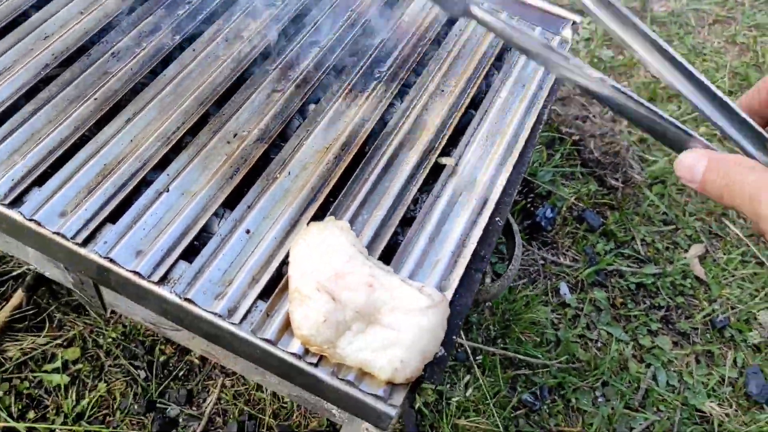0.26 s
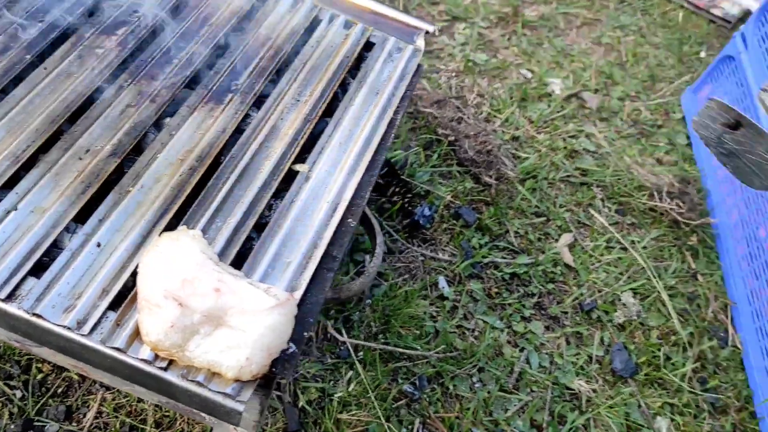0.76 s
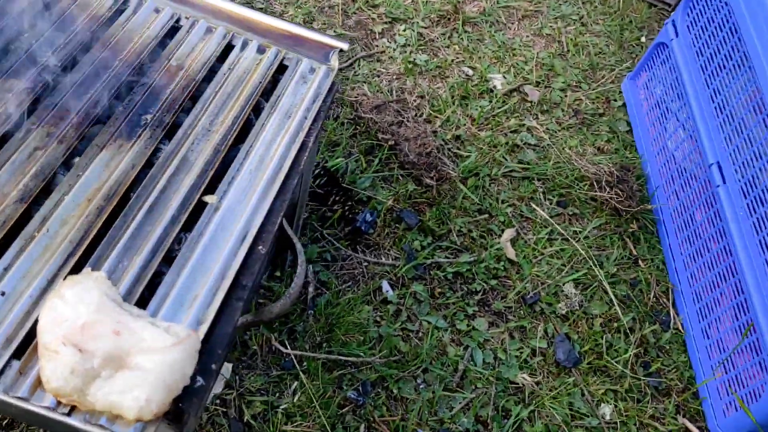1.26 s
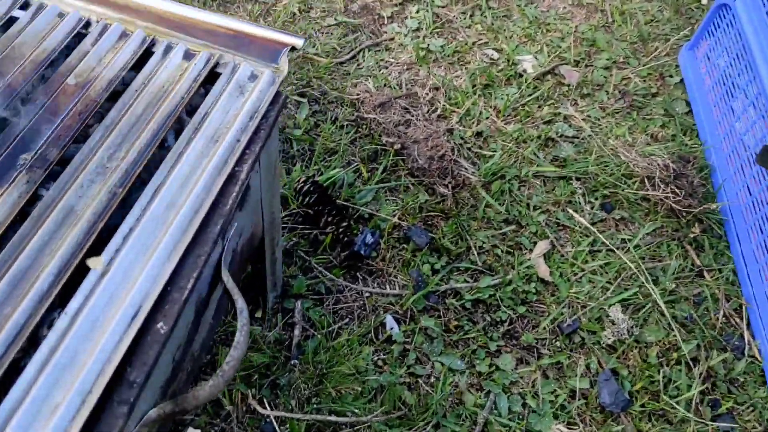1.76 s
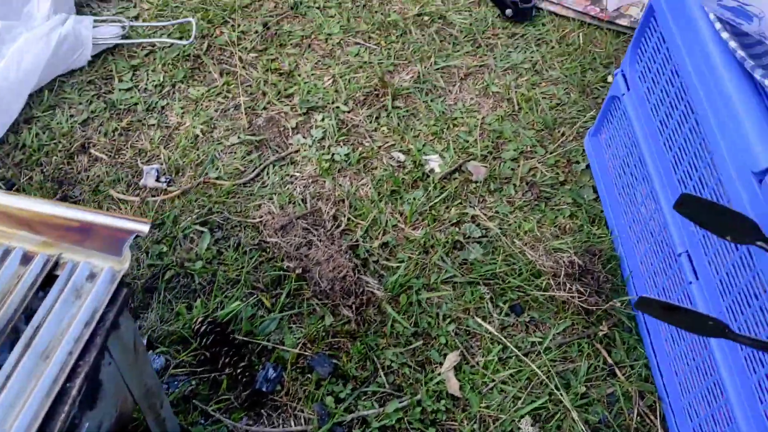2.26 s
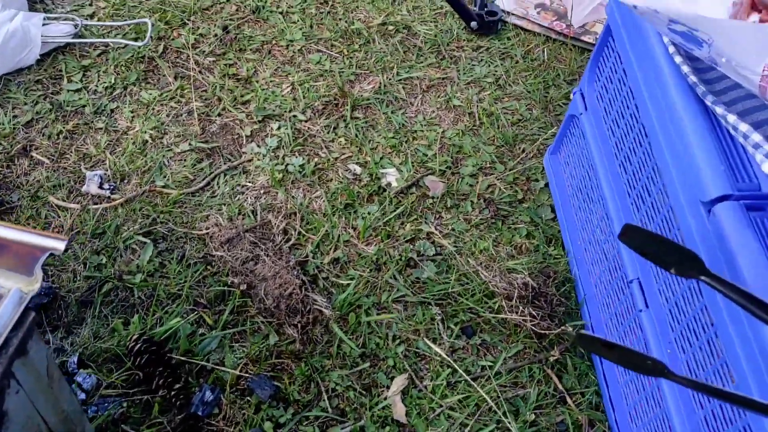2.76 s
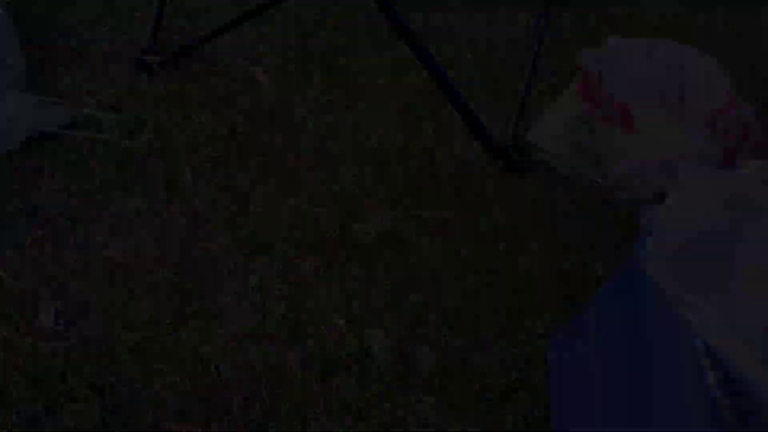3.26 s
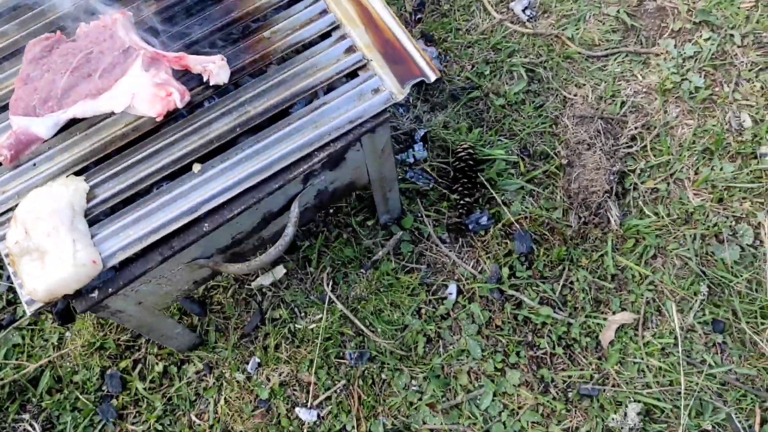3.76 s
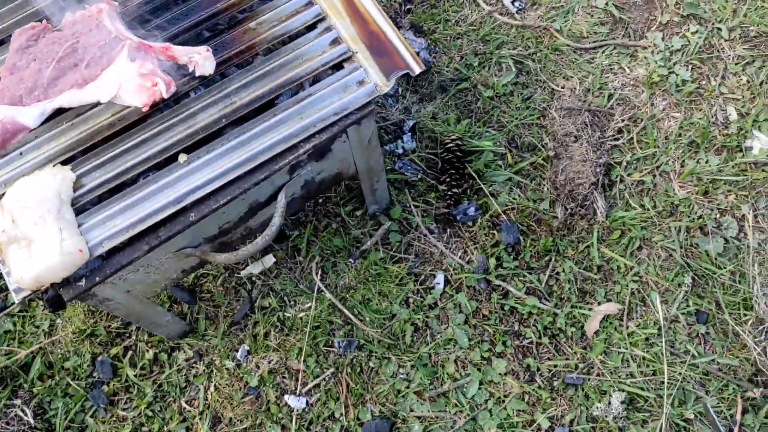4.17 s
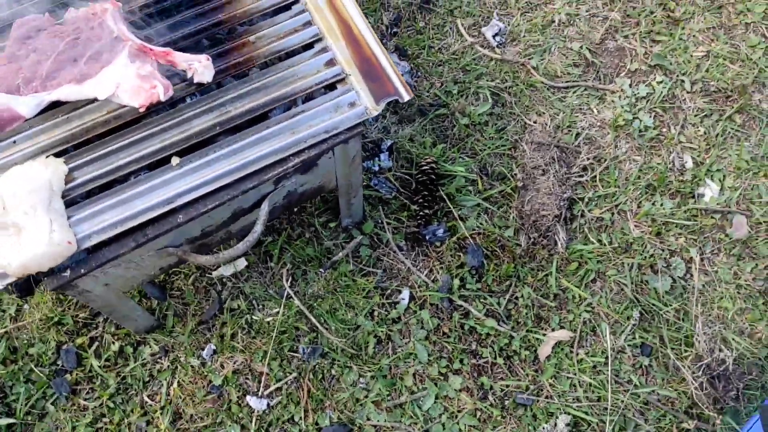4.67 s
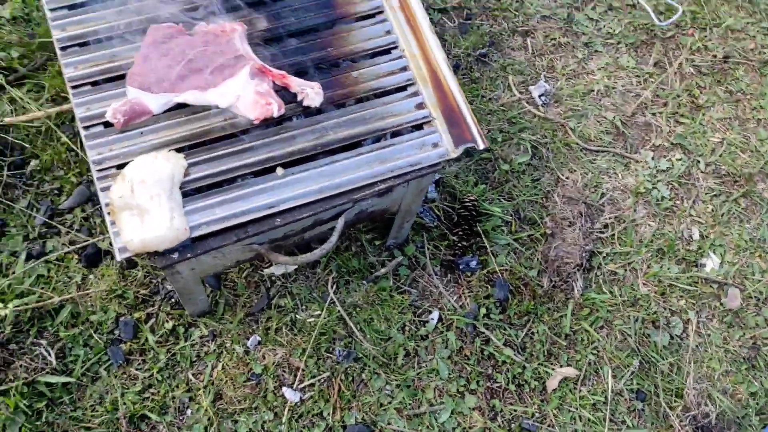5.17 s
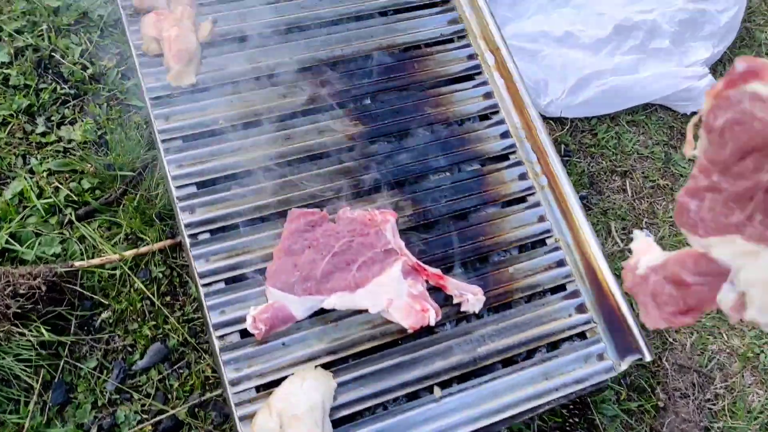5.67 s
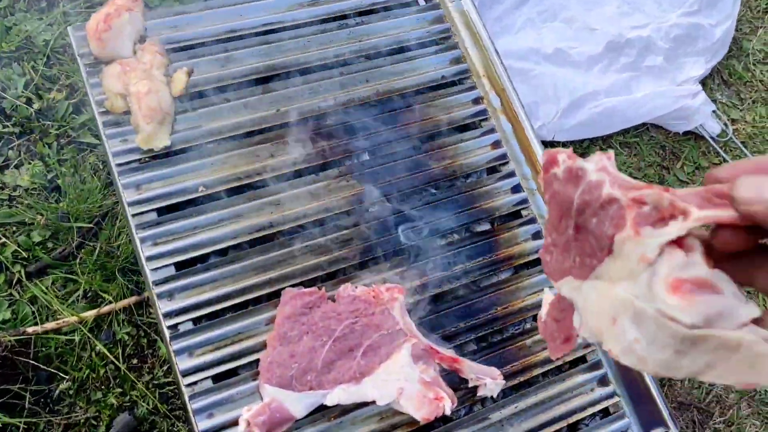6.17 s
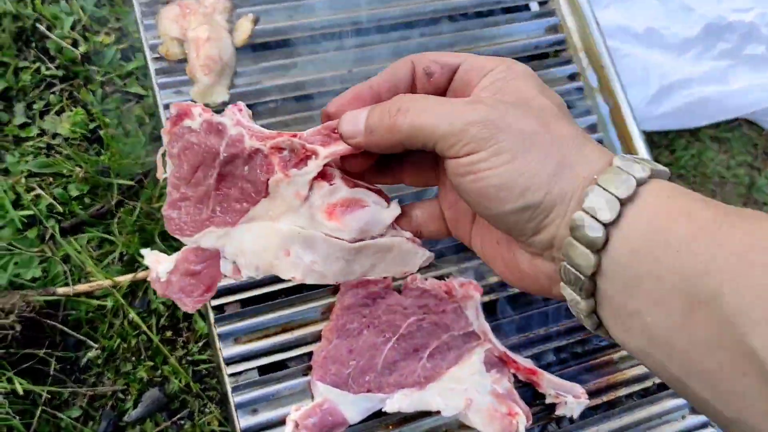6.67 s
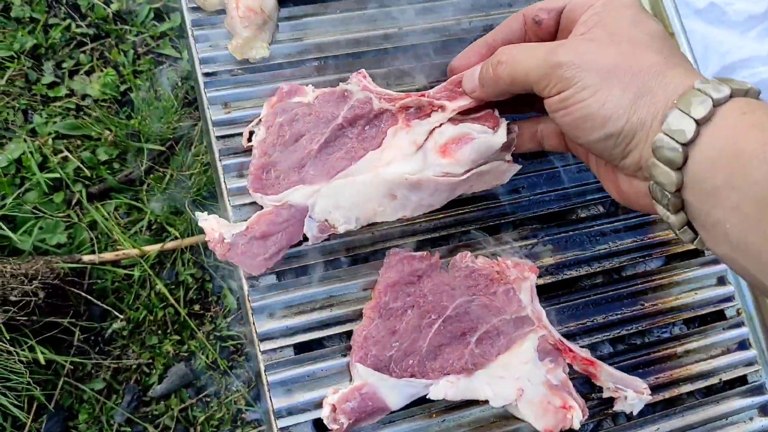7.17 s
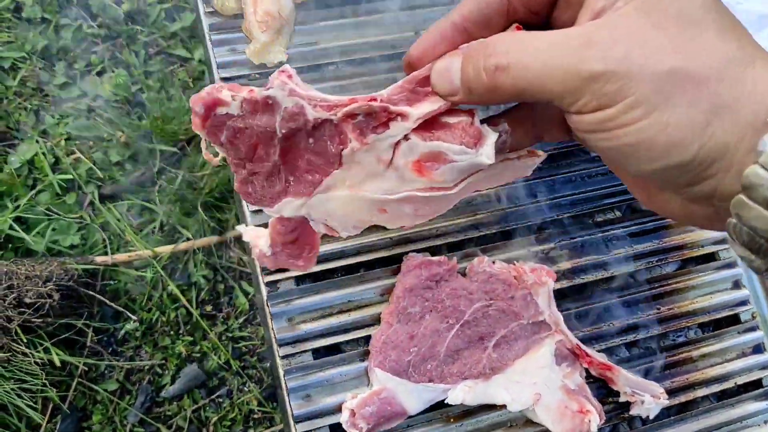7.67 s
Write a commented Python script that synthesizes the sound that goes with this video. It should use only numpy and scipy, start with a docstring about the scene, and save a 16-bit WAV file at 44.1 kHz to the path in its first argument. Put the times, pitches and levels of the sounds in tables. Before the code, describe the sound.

Outdoors, over a faint distant hum, metal tongs clank twice against a grill and then land in a plastic crate while the coals hiss softly. After a tiny break in the sound, meat sizzles close to the microphone, bright and uneven, surging and popping with fat until the end. Soft wind rumble and dull finger bumps come through the handheld microphone, and a finger knocks it sharply just before the finish.

```python
"""Chop on a charcoal grill.

Steel tongs knock twice on the bars and ring, then drop into a plastic crate; fat hisses on the coals.
After two brief dropouts a chop sizzles close by: bursting steam bubbles, flares of juice, spits of fat.
Wind and fingers brush the handheld recorder, whose two microphone ports each ring at their own pitch.
A distant outdoor hum lies underneath."""
import sys
import numpy as np
from scipy import signal
from scipy.fft import rfft, irfft
from scipy.io import wavfile
from scipy.ndimage import uniform_filter1d

SR = 44100
rng = np.random.default_rng(int(sys.argv[2]) if len(sys.argv) > 2 else 0)


def int16_out(signal):
    """Quantize to a 16-bit WAV file."""
    q = np.round(np.clip(np.atleast_2d(signal).T, -1, 1) * 32767)
    wavfile.write(sys.argv[1], SR, q.astype(np.int16))


N = 349713
T = np.arange(N) / SR
TAPS, BAND_LIMIT_HZ = 4096, 15750
BIN_HZ, FULL_BIN_HZ = np.fft.rfftfreq(TAPS, 1 / SR), np.fft.rfftfreq(N, 1 / SR)


def amp(db):
    return 10 ** (np.asarray(db) / 20)


def unit_rms(x):
    return x / np.sqrt(np.mean(x ** 2) + 1e-20)


def curve(rows):
    return np.interp(T, *np.transpose(rows))


def add(mix, start_s, sound):
    part = mix[:, round(start_s * SR):][:, :sound.shape[1]]
    part += sound[:, :part.shape[1]]


def spectrum(rows):
    """Breakpoints to dB per bin, left and right."""
    hz, *columns = np.transpose(rows)
    return np.array([np.interp(np.log(BIN_HZ + 1), np.log(hz), db) for db in columns]) * np.ones((2, 1))


def colour(x, db):
    """Minimum-phase filter; keeps the power of white noise."""
    log_gain = np.log(unit_rms(amp(db)) + 1e-5)
    mirrored = np.concatenate([log_gain, log_gain[:, -2:0:-1]], axis=1)
    response = np.fft.ifft(np.exp(np.conj(signal.hilbert(mirrored)))).real
    return signal.oaconvolve(x, response, axes=1)[:, :x.shape[1]]


def wander(hz):
    """Low-passed random drift, RMS 1."""
    return unit_rms(irfft(rfft(rng.standard_normal(N)) / (1 + (FULL_BIN_HZ / hz) ** 2), N))


def swell(start_s, length_s, attack_s, release_s):
    """Linear rise, hold, exponential fall."""
    t = T - start_s
    return np.clip(t / attack_s, 0, 1) * np.exp(-np.clip((t - length_s) / release_s, 0, 30))


def swells(rows, attack_s, release_s, rest_db):
    """Power sum of swells and a resting level."""
    power = sum((amp(db) * swell(s, length_s, attack_s, release_s)) ** 2 for s, length_s, db, *_ in rows)
    return np.sqrt(amp(rest_db) ** 2 + power)


def burst(decay_s, tail_db=-35, tail_s=0.026):
    """Noise puff with a weak tail; energy of 20 ms at RMS 1."""
    t = T[:SR // 4]
    puff = rng.standard_normal((2, len(t))) * (np.exp(-t / decay_s) + amp(tail_db) * np.exp(-t / tail_s))
    return puff * np.sqrt(.02 * SR / np.sum(puff ** 2, axis=1, keepdims=True))


def close_pair(x, merge_hz=450):
    """Long waves reach both ports alike: the channels merge in the bass."""
    coherence = 1 / (1 + (FULL_BIN_HZ / merge_hz) ** 2)
    mid = rfft(x[0] + x[1]) * np.sqrt(1 + coherence) / 2
    side = rfft(x[0] - x[1]) * np.sqrt(1 - coherence) / 2
    return irfft(np.array([mid + side, mid - side]), N)


# Port resonances, left then right: f/Hz, width/Hz, gain/dB
PORT_MODES = [(8530, 945, 19), (7292, 860, 18)]

def ported(rows):
    """Spectrum behind the two resonant microphone ports."""
    power = [1 + (amp(db) ** 2 - 1) / (1 + (2 * (BIN_HZ - hz) / width) ** 2)
             for hz, width, db in PORT_MODES]
    return spectrum(rows) + 10 * np.log10(power)


# Hum spectrum: f/Hz, level/dB
HUM_SPECTRUM = [(30, 8), (120, -14.5), (290, 2.5), (450, -7.5), (1200, -18), (12000, -38.5)]
# Hum envelope: t/s, level/dB
HUM_LEVEL = [(0, -56.5), (.87, -54), (1.02, -61.5), (1.45, -53), (1.9, -59), (2.6, -65.5), (3.5, -60)]

def distant_hum():
    """Low outdoor noise, slightly left."""
    air = amp(curve(HUM_LEVEL)) * colour(rng.standard_normal((2, N)), ported(HUM_SPECTRUM))
    return close_pair(air) * amp([[2], [-2]])


# Sizzle spectrum: f/Hz, then level/dB for side left, side right, front left, front right
SIZZLE_SPECTRA = np.array([(290, -21.5, -27.5, -25.5, -27.0), (1550, -25.5, -24, -15.5, -12.5),
                  (2430, -14.5, -3.5, -13.5, -6.5), (6300, -11.0, -10.5, -6.5, -2),
                  (6790, -6.0, 1.0, -1.5, -9.0), (9080, -9, 1.0, -2.0, 0),
                  (10570, -19.0, -12.5, -13.0, -7.5), (14960, -19.5, -21.0, -15.0, -3.5)])

def sizzle_colour(x, facing):
    """Tone of the sizzle by direction: 0 = off to the right, 1 = ahead."""
    side, front = ported(SIZZLE_SPECTRA[:, :3]), ported(SIZZLE_SPECTRA[:, [0, 3, 4]])
    return (1 - facing) * colour(x, side) + facing * colour(x, front)


def bubbles(spread_db, clump_db, steady_power, per_s=2400, decay_s=0.00055):
    """Tiny steam bubbles burst in clumps over a steady hiss."""
    size = amp(spread_db * np.minimum(rng.exponential(1, N), 5))
    pops = size * (rng.random(N) < per_s / SR) * amp(clump_db * wander(hz=42))
    power = signal.lfilter([1], [1, -np.exp(-2 / (decay_s * SR))], pops ** 2)
    return unit_rms(np.sqrt(power / power.mean() + steady_power) * rng.standard_normal((2, N)))


# Steam hiss: f/Hz, level/dB
JET_SPECTRUM = [(300, -2), (6000, -4), (10500, -20.5)]

def steam_jet(hz, hump_db=8):
    """Unsteady rush of steam, lifted in the octave around hz."""
    hump = hump_db / (1 + (2 * np.log2((BIN_HZ + 1) / hz)) ** 2)
    rush = rng.standard_normal((2, N)) * amp(1.8 * wander(hz=20))
    return colour(rush, spectrum(JET_SPECTRUM) + hump)


# Steam puffs off the coals: t/s, length/s, level/dB, f/Hz
COAL_PUFFS = [(0.95, 0.31, -52.5, 1500), (1.22, 0.31, -52, 5300), (1.85, 0.25, -61, 2287),
              (3.03, 0.11, -51, 5300)]

def coals(attack_s=.2, release_s=0.25, rest_db=-67.5, fizz_db=-58.5):
    """Fat steams on the coals until the second dropout ends; fizz grows with the steam."""
    steam_level = swells(COAL_PUFFS, attack_s, release_s, rest_db)
    fizz = sizzle_colour(bubbles(spread_db=2, clump_db=2.5, steady_power=1.3), facing=0)
    steam = amp(rest_db) * steam_jet(hz=5400)
    for s, length_s, db, hz in COAL_PUFFS:
        steam += amp(db) * swell(s, length_s, attack_s, release_s) * steam_jet(hz)
    hiss = np.hypot(amp(fizz_db), 0.56 * steam_level) * fizz + steam
    return hiss * (T < DROPOUTS[1][1])


def strike(hits, clash_spectrum, modes, ring_db, shimmer_db, shimmer_t60_s):
    """Each blow: a brief clash, a few strong modes, a shimmer of 240 weak ones."""
    clash, ring = np.zeros((2, N)), np.zeros((2, N))
    t, t_short = T[:SR], T[:SR // 4]
    weak_hz = rng.uniform(0, np.sqrt(BAND_LIMIT_HZ), (240, 1)) ** 2
    fade = amp(-60 * t_short / (shimmer_t60_s * rng.uniform(.5, 1, weak_hz.shape)))
    weak_modes = fade * np.sin(2 * np.pi * weak_hz * t_short) / np.sqrt(len(weak_hz))
    for s, db, decay_s in hits:
        add(clash, s, amp(db) * burst(decay_s))
        add(clash, s, amp(db + shimmer_db) * rng.standard_normal((2, len(weak_hz))) @ weak_modes)
        for hz, mode_db, t60_s in modes:
            phase = 2 * np.pi * rng.random() + np.array([[0], [1]])
            add(ring, s, amp(db + mode_db - 60 * t / t60_s) * np.sin(2 * np.pi * hz * t + phase))
    return colour(clash, ported(clash_spectrum)) + amp(ring_db) * ring


# Knocks and bounces on the bars: t/s, level/dB, contact decay/s
BAR_HITS = [(0.1105, -18, 0.0092), (0.1255, -26, 0.0028), (0.2575, -17, 0.0035), (0.285, -30, 0.0085)]
# Steel clash: f/Hz, level/dB
BAR_SPECTRUM = [(100, -25.5), (300, -3), (750, -4.5), (1200, -7), (2300, 5), (3100, -13), (4200, -5.5),
                (8500, -5), (12000, -12.5)]
# Modes of tongs and bars: f/Hz, level/dB, t60/s
BAR_MODES = [(264.7, -16, 0.91), (404, -8.5, 0.24), (3919, -10, 0.2), (5140, -13.5, 0.66),
             (6800, 10.5, 0.048), (7320, 6, 0.14), (7460, 5.5, 0.098), (8390, 12.5, 0.058),
             (9900, -22.5, 0.37), (12710, -11.5, 0.17)]

def tongs_on_bars():
    """Steel hits steel, bounces and rings."""
    steel = strike(BAR_HITS, BAR_SPECTRUM, BAR_MODES, ring_db=-12, shimmer_db=-1, shimmer_t60_s=0.16)
    return close_pair(steel * amp([[1], [-1]]))


# Single spits of fat: t/s, level/dB
FAT_SPITS = [(0.505, -55), (1.769, -51), (2.389, -52), (3.653, -26), (4.1565, -24.5), (5.503, -30),
             (5.5732, -25), (5.6714, -22.5), (5.7907, -26), (5.9496, -28.5), (6.0549, -26), (6.1167, -28.5),
             (6.4904, -23.5), (7.2543, -23.5), (7.283, -23.5), (7.3777, -25), (7.606, -25), (7.7265, -27),
             (7.8193, -22)]

def spits(heat, small_per_s=16, small_db=-12, ping_hz=(7700, 9270), ping_decay_s=0.00052):
    """Fat drops burst with a ping and a puff; small random ones follow the sizzle level."""
    out, t = np.zeros((2, N)), T[:SR // 4]
    onsets = np.flatnonzero((rng.random(N) < small_per_s / SR) * (T > JUICE_FLARES[0][0]))
    levels_db = 20 * np.log10(heat[onsets]) + small_db + 3.5 * rng.uniform(-1, 1, len(onsets))
    for s, db in FAT_SPITS + list(zip(T[onsets], levels_db)):
        ping = amp(12) * np.cos(2 * np.pi * rng.uniform(*ping_hz) * t) * np.exp(-t / ping_decay_s)
        puff = amp(-2) * burst(decay_s=0.00088, tail_db=-24)
        add(out, s, amp(db) * (ping + puff))
    return out


# Gusts: t/s, length/s, level/dB
WIND_GUSTS = [(0.88, 0.2, -44), (3.55, 0.35, -41), (4.22, 0.5, -42), (5.17, 0.3, -40), (6.27, 0.106, -48),
              (6.85, 0.16, -41)]
# Wind rumble: f/Hz, level/dB
WIND_SPECTRUM = [(20, 0.5), (90, -12), (200, -24.5), (1000, -55)]

def wind():
    """Lumps of wind buffet each port separately, mostly the left."""
    lumps = np.array([unit_rms(amp(5.7 * wander(hz=6.3))) for _ in range(2)])
    level = swells(WIND_GUSTS, attack_s=0.04, release_s=0.0063, rest_db=-69.5)
    rumble = colour(rng.standard_normal((2, N)) * lumps, spectrum(WIND_SPECTRUM))
    return level * rumble * amp([[3], [-10]])


# Bumps of the grip: t/s, level/dB, f/Hz
GRIP_BUMPS = [(1.885, -54, 500), (3.462, -46.5, 293), (3.556, -40.5, 83.5), (3.651, -45, 1170),
              (3.767, -47, 517), (3.789, -42.5, 564), (3.876, -43, 600), (4.017, -45.5, 327),
              (4.114, -41.5, 385), (4.209, -50, 290), (4.242, -49, 700), (4.334, -50, 830),
              (4.428, -47, 450), (4.502, -52, 790), (4.695, -46.5, 330), (4.785, -40, 79.4),
              (4.914, -39, 100), (5.039, -39, 89.5), (5.053, -37.5, 162), (5.39, -44, 191),
              (6.161, -41, 430)]

def grip_bumps():
    """Dull finger blows on the casing, mostly left; lower ones last longer."""
    out = np.zeros((2, N))
    for s, db, hz in GRIP_BUMPS:
        casing = spectrum([(hz / 5, -14), (hz * 1.01, 0), (hz * 3, -14), (hz * 20, -55)])
        blow = burst(decay_s=0.007 * np.sqrt(400 / hz))
        add(out, s, amp(db) * colour(blow, casing))
    return out * amp([[4], [-8]])


# Landings in the crate: t/s, level/dB, contact decay/s
CRATE_HITS = [(2.0098, -23.5, 0.0034), (2.0150, -22.5, 0.0025), (2.184, -37.5, 0.0018),
              (2.1945, -36, 0.0088)]
# Blow on plastic: f/Hz, level/dB
PLASTIC_SPECTRUM = [(80, -32.5), (230, -2), (550, -4.5), (1150, 6.5), (1700, -10), (2600, -2.5),
                    (3600, -16.5), (15000, -37.5)]
# Crate modes: f/Hz, level/dB, t60/s
PLASTIC_MODES = [(206, -7, 0.2), (417, -4, 0.1), (1085, -14, 0.2), (1260, -2, 0.045), (2053, 6.5, 0.0309)]

def tongs_in_crate():
    """The tongs land on plastic and settle."""
    return close_pair(strike(CRATE_HITS, PLASTIC_SPECTRUM, PLASTIC_MODES,
                             ring_db=-13.5, shimmer_db=-11.5, shimmer_t60_s=0.076))


# Casing click: f/Hz, level/dB
TICK_SPECTRUM = [(400, 1.5), (1700, -4), (8000, -22)]

def tick():
    return colour(burst(decay_s=0.0013), ported(TICK_SPECTRUM))


# Casing ticks: t/s, level/dB
CASING_TICKS = [(2.9, -50.5), (7.488, -40)]

def casing_ticks():
    """The casing clicks drily in the hand."""
    out = np.zeros((2, N))
    for s, db in CASING_TICKS:
        add(out, s, amp(db) * tick())
    return out


def patchy(x, depth_db, width_hz, life_s):
    """Short-lived resonances at random pitches."""
    frames = signal.stft(x, nperseg=512, noverlap=384)[2]
    field = rng.standard_normal(frames.shape[1:])
    lag_s = np.fft.fftfreq(field.shape[0], SR / 512)[:, None]
    rate_hz = np.fft.fftfreq(field.shape[1], 128 / SR)
    blur = np.exp(-(lag_s * width_hz) ** 2 - (rate_hz * life_s) ** 2)
    gain_db = depth_db * unit_rms(np.fft.ifft2(np.fft.fft2(field) * blur).real)
    return signal.istft(frames * unit_rms(amp(gain_db)), nperseg=512, noverlap=384)[1][:, :N]


# Simmer between flares: t/s, level/dB
SIMMER_LEVEL = [(3.4, -45.5), (3.62, -27), (5.4, -30), (5.87, -33), (6.1, -26.5), (6.65, -29.5),
                (7.9, -25.5)]
# Juice meets the hot bars: t/s, length/s, level/dB, outer-band gain/dB
JUICE_FLARES = [(3.645, 0.019, -24, 3.5), (3.821, 0.13, -25, 0.5), (4.024, 0.19, -26.5, -2),
                (4.444, 0.081, -24.5, 1), (4.578, 0.24, -29, 3), (5.068, 0.11, -26.5, 3.5),
                (5.268, 0.1, -25.5, -1), (5.646, 0.056, -24.5, -5), (5.736, 0.019, -26, -1),
                (6.358, 0.1, -24, -3), (6.903, 0.21, -23.5, -0.5), (7.15, 0.13, -24.5, -0.5),
                (7.415, 0.023, -18, -2), (7.787, 0.19, -32.5, 1.5)]
# Grill direction: t/s, facing (0 = right, 1 = ahead)
GRILL_FACING = [(3.4, 0.21), (5.2, 0.02), (5.55, 0.68), (6.2, 0.73)]

def chop(attack_s=0.02, release_s=0.04):
    """Fat spits throughout; from the end of the first dropout the chop simmers, flares and sputters."""
    fizz = bubbles(spread_db=2.8, clump_db=1, steady_power=0.4) * (T > DROPOUTS[0][1])
    heat = swells(JUICE_FLARES, attack_s, release_s, curve(SIMMER_LEVEL))
    steam = patchy(amp(1.62) * heat * fizz, depth_db=3, width_hz=270, life_s=0.045)
    sizzle = sizzle_colour(steam + spits(heat) + sputters(), curve(GRILL_FACING))
    # Bubble sizes come and go, so the outer bands waver separately.
    low = signal.sosfiltfilt(signal.butter(4, 5500, fs=SR, output="sos"), sizzle)
    high = signal.sosfiltfilt(signal.butter(4, 10500, "high", fs=SR, output="sos"), sizzle)
    outer_db = 3.5 + sum(db * swell(s, length_s, attack_s, release_s) for s, length_s, _, db in JUICE_FLARES)
    low_db = outer_db + wander(hz=35.8)
    high_db = outer_db + 2 * wander(hz=30)
    return sizzle + (amp(low_db) - 1) * low + (amp(high_db) - 1) * high


def air_push():
    """Pressure pulse in a port: a slow swing and a brief 170 Hz ring."""
    t = T[:SR // 2]
    ring = 0.2 * np.sin(2 * np.pi * 170 * t) * np.exp(-t / 0.012)
    swing = (1 - t / 0.06) * np.exp(-t / 0.06) * (1 - np.exp(-t / 0.0054))
    return ring - swing


def squeeze(start_s=3.468, db=-29):
    """The hand closes and presses air into the left port."""
    out = np.zeros((2, N))
    add(out, start_s, amp(db) * amp([[0], [-30]]) * air_push())
    return out


# Pockets of juice: t/s, length/s, level/dB, f/Hz
JUICE_POCKETS = [(4.156, 0.019, -24.5, 7250), (5.448, 0.024, -28.5, 7100), (5.542, 0.037, -26.5, 8800),
                 (5.656, 0.0076, -15.5, 9050), (6.4, 0.011, -24, 7900)]

def sputters(decay_s=0.00028):
    """Each pocket boils out in a quick run of pings at one pitch."""
    out, t = np.zeros((2, N)), T[:TAPS]
    for s, length_s, db, hz in JUICE_POCKETS:
        pops = unit_rms(rng.standard_normal((2, round(length_s * SR))) ** 3)
        ping = np.cos(2 * np.pi * hz * t) * np.exp(-t / decay_s)
        add(out, s, amp(db) * signal.fftconvolve(pops, ping[None] / np.linalg.norm(ping)))
    return out


def finger_tap(start_s=7.46):
    """A finger hits the right port: tick, push of air, thud of the casing."""
    out, t = np.zeros((2, N)), T[:SR // 2]
    pan = amp([[-30], [0]])
    thud = np.sin(2 * np.pi * 380 * t) * np.exp(-t / 0.00045)
    add(out, start_s, pan * amp(-27.5) * tick())
    add(out, start_s + 0.0018, pan * amp(-9) * air_push())
    add(out, start_s + 0.00272, pan * amp(2) * thud)
    return out


def scene():
    return (distant_hum() + coals() + tongs_on_bars() + wind() + grip_bumps() + tongs_in_crate()
            + casing_ticks() + chop() + squeeze() + finger_tap())


# Dropouts: start t/s, end t/s
DROPOUTS = [(3.338, 3.353), (3.402, 3.434)]

def record(dry):
    """Two brief dropouts, peak clipping, band limit."""
    gate = 1 - .97 * sum((T > start_s) & (T < end_s) for start_s, end_s in DROPOUTS)
    clipped = np.clip(dry * uniform_filter1d(gate, size=90), -.88, .88)
    lowpass = signal.firwin(255, BAND_LIMIT_HZ, window=("kaiser", 8), fs=SR)
    return signal.oaconvolve(clipped, lowpass[None], "same")


dry = scene()
out = record(dry)
int16_out(out)
```